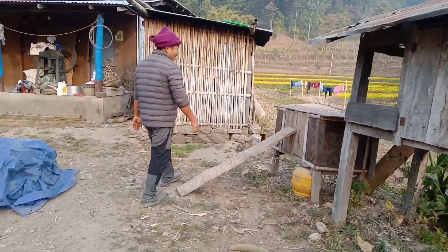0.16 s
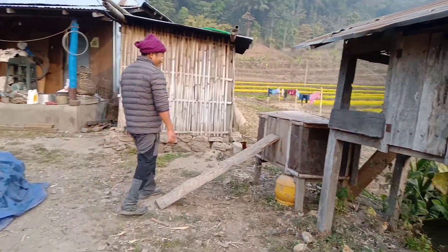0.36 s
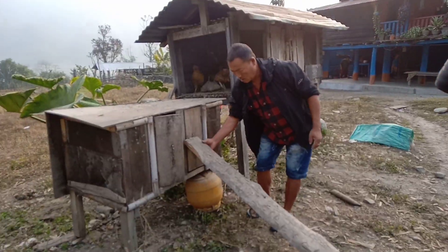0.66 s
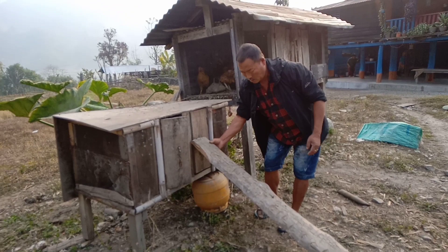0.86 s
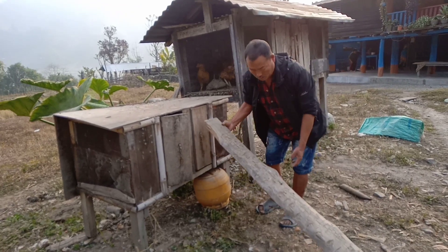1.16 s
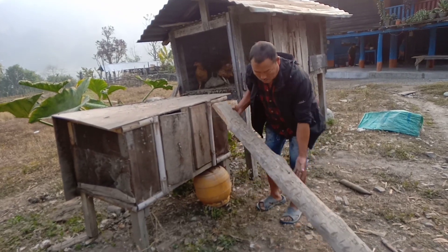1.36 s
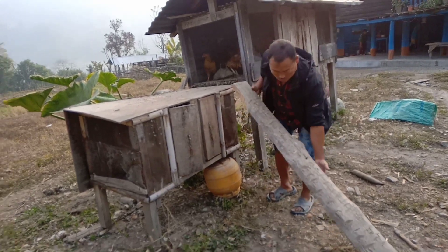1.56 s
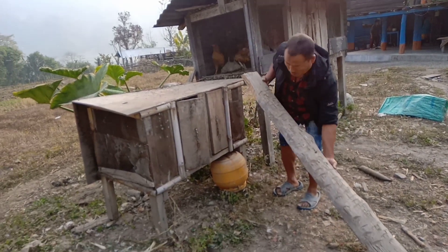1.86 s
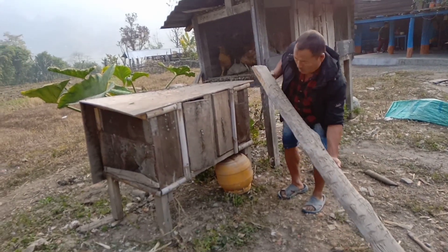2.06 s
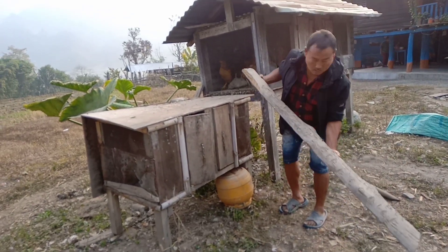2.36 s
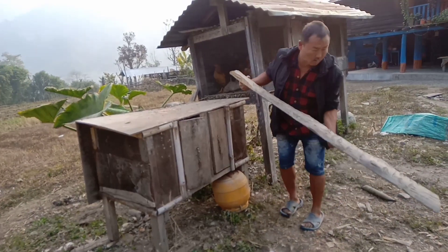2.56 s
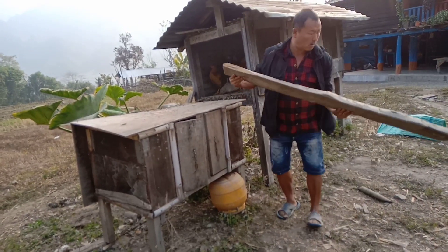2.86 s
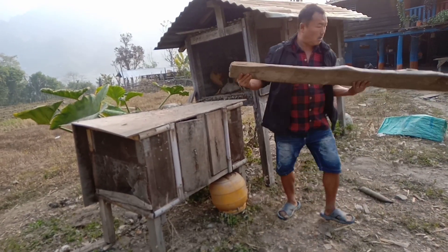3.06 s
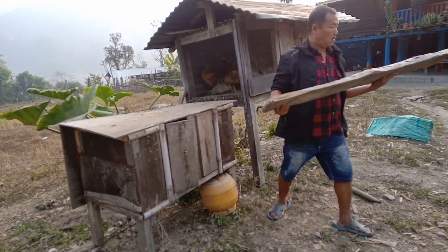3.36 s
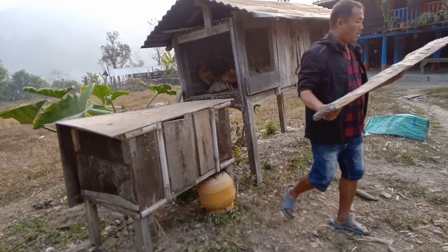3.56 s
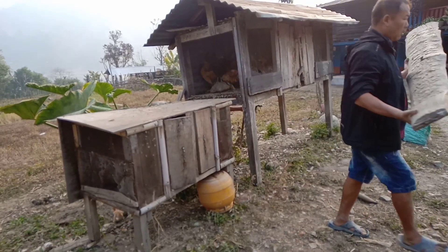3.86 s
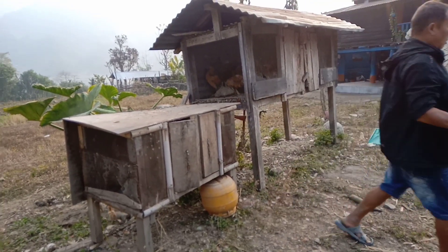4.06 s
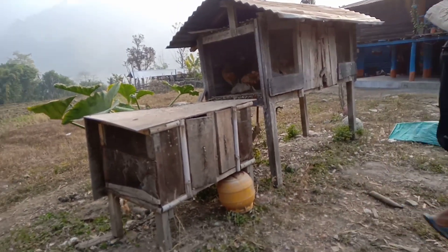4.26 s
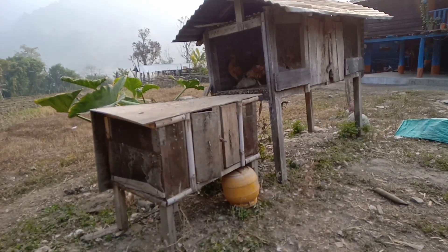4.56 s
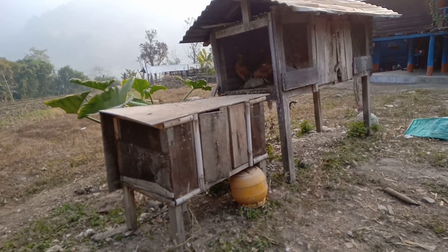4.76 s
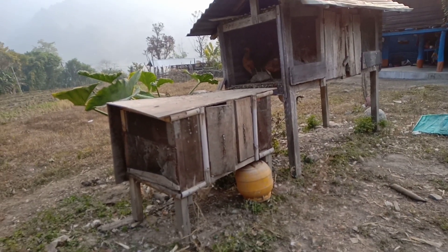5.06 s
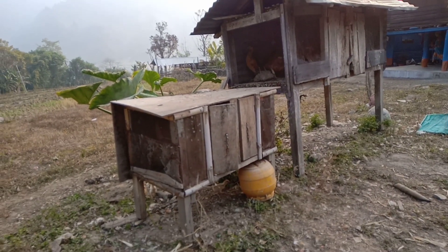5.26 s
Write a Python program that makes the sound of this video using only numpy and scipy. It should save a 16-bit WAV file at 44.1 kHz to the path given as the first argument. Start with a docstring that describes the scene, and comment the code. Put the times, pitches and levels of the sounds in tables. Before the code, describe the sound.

An outdoor village yard with soft air, slight hiss and a bright, diffuse echo from houses and wooden coops. The scene opens on the end of a goose honk, with a brief low hen croon, then a stick snaps sharply with a small thump at 0.19 s. The sound almost vanishes around 0.4 s. A hoarse honk swells from about 0.45 s and breaks into a rough growl until 0.93 s. Loud reedy honks follow at 1.65-2.07, 2.88-3.28 and 4.09-4.55 s, each scooping up, brightening into a high whistle, cracking upward and falling in a rasp. Chicks peep thinly throughout, clearer after 1 s, sliding downward, with fainter ones behind. The hen croons waveringly at 1.7-2.7 s and briefly at 3.3 and 3.6-4.1 s. Dull plank knocks and scuffs come near 0.2, 1.37, 1.55, 2.56, 4.7 and 5.34 s. Phone-like microphone, thin bass, goose a few metres away.

```python
"""Goose honking in a village yard

A domestic goose honks four times, a few metres from the microphone, among small wooden coops.
Its two syrinx membranes give a low reedy voice and a high whistle, multiplied for their sum tones;
in the last three honks the voice cracks upward, then falls in a rasp. The end of a honk opens the scene.
Chicks peep as sliding near-sines, a hen croons low, a stick snaps and a plank is handled as noise
bursts and thumps; noise echoes return the bright tail of the houses over soft open air."""
import sys
import numpy as np
from scipy import signal
from scipy.fft import rfft, irfft
from scipy.io import wavfile
from scipy.ndimage import uniform_filter1d, minimum_filter1d

SR = 44100
rng = np.random.default_rng(int(sys.argv[2]) if len(sys.argv) > 2 else 0)


def bounce(signal):
    """Save signal as a 16-bit WAV file at the path given by the first command-line argument."""
    frames = np.transpose(np.atleast_2d(signal))
    limited = np.clip(frames, -1, 1)
    pcm = np.round(limited * 32767).astype(np.int16)
    wavfile.write(sys.argv[1], SR, pcm)


N = 239330
TIME = np.arange(N) / SR
TOP_HZ = 15750  # top of the microphone's band
ATTACK_S = 0.0091  # onset of an opening, and of the rasp in a crack or fall

# stretches where the low voice repeats only every few cycles: [from t/s, to t/s, cycles, depth]
VOICE_SPLITS = [(.73, .93, 3, .27), (2.915, 2.975, 3, .22), (4.135, 4.2, 2, .06)]
# the throat's colour above the third harmonic: [f/Hz, level/dB]
THROAT_COLOUR = [(1700, 29.5), (2400, 6.5), (3050, 5), (3700, 5), (4300, -0.5), (5300, 3), (6300, -5),
                 (7300, -6), (8600, -21.5), (11000, -30.5), (15000, -36.5)]


def undb(db):
    """Decibels to gain."""
    return 10 ** (np.asarray(db) / 20)


def unit(x):
    """Scale to rms 1."""
    return x / np.sqrt(np.mean(x ** 2) + 1e-20)


def gain_at(points, hz):
    """Gain of a (Hz, dB) spectrum on a log axis."""
    f, db = np.transpose(points)
    return undb(np.interp(np.log(np.maximum(hz, 1)), np.log(f), db))


def colour(x, points):
    """Filter x by a (Hz, dB) spectrum that closes below its first point."""
    hz = np.fft.rfftfreq(len(x), 1 / SR)
    bass_cut = np.minimum(hz / points[0][0], 1) ** 2
    return irfft(rfft(x) * gain_at(points, hz) * bass_cut, len(x))


def noise(points):
    """Coloured noise of rms 1."""
    return unit(colour(rng.standard_normal(N), points))


def wander(rate, size=N):
    """Smooth random motion of rms 1, about rate turns a second."""
    k = max(int(SR / rate), 2)
    steps = np.repeat(rng.standard_normal(size // k + 2), k)
    return unit(uniform_filter1d(steps, k)[:size])


def gate(start, end, edge):
    """1 between two times, with soft edges."""
    return np.clip(np.minimum(TIME - start, end - TIME) / edge + .5, 0, 1)


def held(start, end, attack, release):
    """Attack, hold and release between two times."""
    return np.clip(np.minimum((TIME - start) / attack, (end - TIME) / release), 0, 1)


def strike(s, rise, t60):
    """Envelope of a blow at time s: a linear rise and an exponential decay."""
    age = np.maximum(TIME - s, 0)
    decay = np.exp(-np.log(1000) * np.minimum(age / t60, 10))
    return np.minimum(age / rise, 1) * decay


def curves(table, edge):
    """A table's gate, followed by its columns sample by sample."""
    s, *columns = np.transpose(table)
    return [gate(s[0], s[-1], edge)] + [np.interp(TIME, s, c) for c in columns]


def cycle(hz, jitter, rate):
    """Phase of an oscillator whose period is unsteady."""
    return 2 * np.pi * np.cumsum(hz * (1 + jitter * wander(rate, size=len(hz)))) / SR


def background():
    """Soft outdoor air and hiss, noise whose lows and highs swell apart, and faint low bands and hums."""
    # spectrum of the open air and the microphone's hiss: [f/Hz, level/dB per Hz]
    air_colour = [(60, -7), (130, -4.5), (400, -5.5), (800, -14.5), (1250, 0), (2000, -10), (3400, -3.5),
                  (5000, -12), (7000, -12), (8800, -26.5), (13800, -38), (15000, -23)]
    # loudness of the air and hiss: [t/s, level/dB]
    air_level = [(0, -51.5), (.38, -60), (.45, -38.5), (1.5, -51.5), (2.8, -53.5), (4, -56), (5.43, -60.5)]
    # faint low bands under the goose's growl and the hen's croon, and other hums:
    # [from t/s, to t/s, f/Hz, width/Hz, level/dB]
    hums = [(.7, 1.07, 210, 120, -45), (.72, .95, 390, 130, -42), (.92, 1.3, 560, 160, -52),
            (.95, 1.58, 131, 12, -58), (1.79, 1.95, 217, 10, -52), (2.1, 2.62, 730, 130, -48),
            (4.7, 5.2, 260, 50, -63), (4.74, 5.18, 870, 320, -58)]
    air = noise(air_colour)
    highs = colour(air, [(900, -30), (2200, 0), (16000, 0)])
    lows = air - highs
    air = lows * undb(1.2 * wander(6)) + highs * undb(2.2 * wander(11))
    out = air * undb(np.interp(TIME, *np.transpose(air_level)))
    for start, end, hz, width, db in hums:
        turn = 2 * np.pi * hz * TIME
        hum = wander(width) * np.sin(turn) + wander(width) * np.cos(turn)
        out = out + undb(db) * gate(start, end, 0.056) * hum
    return out


def chatter(db, spread_db, count):
    """Fainter chicks further off: short downward-curving sines at random moments."""
    out = np.zeros(N)
    for when, pitch, length, size in rng.random((count, 4)):
        t = np.linspace(0, 1, int(SR * (0.026 + 0.02 * length)))
        start = int((1 + when * 4.3) * SR)
        hz = (3500 + 1100 * pitch) * (1 - 0.44 * t ** 2)
        peep = np.sin(np.pi * t) * np.sin(cycle(hz, 0.02, 300))
        out[start:start + len(t)] += (undb(db + spread_db * size) * peep)[:N - start]
    return out


def chicks(jitter, flutter_db, overtone_db):
    """Each peep is a near sine that moves gently to a knee in its pitch, then slides down."""
    # peeps: [knee t/s, lead/s, fall/s, start f/Hz, knee f/Hz, level/dB before the 10 dB lift below]
    peeps = [(.304, 0.031, 0.056, 4300, 4410, -57), (1.058, 0.056, 0.039, 4280, 3750, -46.5),
             (1.25, 0.071, 0.069, 4020, 3550, -43.5), (1.314, 0.04, 0.046, 4750, 3454, -43.5),
             (2.199, 0.04, 0.059, 4580, 3890, -48), (2.239, 0.026, 0.028, 3610, 3197, -36),
             (2.45, .019, 0.027, 4400, 3890, -44.5), (2.476, 0.059, 0.029, 3730, 3040, -42.5),
             (2.631, 0.13, 0.073, 4110, 3876, -48.5), (2.845, .069, 0.063, 4120, 3990, -48),
             (3.416, 0.046, 0.04, 3110, 3080, -43), (3.53, .15, 0.052, 4050, 3804, -44.5),
             (3.735, 0.062, .08, 4170, 3996, -42.5), (3.83, .025, 0.033, 3410, 3380, -44),
             (4.061, 0.016, 0.049, 4200, 4170, -52.5), (4.651, .084, .036, 3540, 3593, -39.5),
             (4.795, 0.022, 0.015, 3765, 3300, -44.5), (4.942, 0.021, 0.015, 4670, 3440, -42),
             (4.99, .021, 0.078, 4080, 4140, -49.5), (5.09, 0.057, 0.064, 4020, 3700, -48.5),
             (5.26, 0.022, 0.028, 4520, 3750, -43), (5.41, 0.031, .03, 4140, 3630, -42)]
    end_share = .79  # the slide ends at this share of the knee's pitch
    out = np.zeros(N)
    for s, lead, fall, start_hz, knee_hz, db in peeps:
        live = (TIME > s - lead) & (TIME < s + fall)
        t, knots = TIME[live], [s - lead, s, s + fall]
        hz = np.interp(t, knots, [start_hz, knee_hz, knee_hz * end_share])
        phase = cycle(hz, jitter, 300)
        flutter = undb(db + 10.0 + flutter_db * wander(131.3, size=len(t)))
        swell = np.interp(t, knots, [0, 1, 0]) ** 0.57 * flutter
        out[live] += swell * (np.sin(phase) + undb(overtone_db) * np.sin(2 * phase))
    return out


def hen(jitter, shimmer):
    """A low, wavering croon: an unsteady sine with weak overtones."""
    # one curve per croon: [t/s, pitch f/Hz, level/dB, overtones' level/dB]
    croons = [
        [(0.085, 386, -48, -4), (0.16, 489, -49, -10)],
        [(1.72, 404.4, -45.5, -1), (1.97, 463, -38, -7), (2.52, 483.5, -39.5, -8), (2.62, 519, -35, -8.5),
         (2.74, 409.5, -40.5, -23)],
        [(3.27, 382.5, -47, -15), (3.332, 367, -45.5, 4), (3.38, 346, -60.5, -27)],
        [(3.62, 417, -48, 7.5), (3.926, 445, -38, -24), (4.12, 389, -53, 2)],
    ]
    out = 0
    for table in croons:
        on, hz, db, top_db = curves(table, .03)
        phase = cycle(hz, jitter, 160)
        overtones = 0.27 * np.sin(2 * phase) + .35 * np.sin(3 * phase) + 0.21 * np.sin(4 * phase)
        overtones = overtones + 0.28 * wander(150) * np.sin(3 * phase / 2)
        out = out + on * undb(db) * (np.sin(phase) + undb(top_db) * overtones)
    return np.sqrt(2) * out * (1 + shimmer * wander(70))


def snap(thump_hz, thump_t60, ring_hz, ring_db):
    """A stick snaps: two clicks with brief noise, the second with a far stronger thump and ring."""
    # cracks: [t/s, crack level/dB before filtering, thump level/dB]
    cracking = [(0.1854, -6.5, -63), (0.1913, -8, -27.5)]
    # the cracks' spectrum: [f/Hz, level/dB]
    crack_colour = [(100, -13), (600, -0.5), (1300, -0.5), (3000, -3), (6500, -7.5), (9000, -24),
                    (15000, -11.5)]
    cracks, body = np.zeros(N), 0
    for s, crack_db, thump_db in cracking:
        cracks[int(s * SR)] -= 3.0 * undb(crack_db)
        cracks = cracks + 1.9 * undb(crack_db) * strike(s, .0001, 0.0015) * rng.standard_normal(N)
        turn = 2 * np.pi * (TIME - s)
        tones = np.sin(thump_hz * turn) + undb(ring_db) * np.sin(ring_hz * turn)
        body = body + undb(thump_db) * strike(s, 0.0007, thump_t60) * tones
    return colour(cracks, crack_colour) + body


def knocks():
    """Plank and feet: decaying bursts of dull wood noise, with some grit in each."""
    # knocks and scuffs: [t/s, level/dB, rise/s, t60/s, grit level/dB relative to the wood]
    blows = [(0.201, -36.5, 0.0057, 0.1, -21), (1.371, -45, 0.0011, 0.051, 7),
             (1.549, -40.5, 0.0054, 0.1, -31), (2.561, -38.5, 0.0046, 0.41, -6.5),
             (4.697, -34.5, 0.0015, 0.11, -21), (5.342, -46, 0.0087, 0.16, -1)]
    # spectrum of the wood: [f/Hz, level/dB]
    wood_colour = [(80, -9.5), (200, -13.5), (450, -14.5), (750, -13), (1000, -13), (1300, -8),
                   (2100, -11.5), (3000, -9.5), (6000, -68), (10000, -44)]
    # spectrum of the grit: [f/Hz, level/dB]
    grit_colour = [(1000, -22.5), (3000, 4), (5500, 8.5), (8000, -4), (11000, -14.5), (15000, -34)]
    wood, grit = noise(wood_colour), noise(grit_colour)
    out = 0
    for s, db, rise, t60, grit_db in blows:
        out = out + undb(db) * strike(s, rise, t60) * (wood + undb(grit_db) * grit)
    return out


def reed(on, hz, base_db, third_db, top_db, beak_hz, jitter=0.0078, shimmer=0.14, waver_db=2.47,
         patchy_db=3.5):
    """Low membrane: three strong harmonics and overtones shaped by the throat; (sound, bare vibration)."""
    # resonances of the windpipe, with a notch near 1195 Hz from the ground's reflection,
    # applied to the first three harmonics: [f/Hz, level/dB]
    windpipe_and_ground = [(430, -0.5), (550, -7), (800, -11.5), (950, -13.5), (1110, -2), (1195, -7.5),
                           (1250, 5.5), (1400, -8.5), (1640, -2), (1800, -8.5), (2500, -15.5)]
    live = on > 0
    hz, base_db, top_db = (np.broadcast_to(c, N)[live] for c in (hz, base_db, top_db))
    size = len(hz)
    phase = cycle(hz, jitter, 450)

    low = 0
    for k, db in enumerate((base_db, 0, third_db), 1):
        level = gain_at(windpipe_and_ground, k * hz) * undb(db + waver_db * wander(37.5, size=size))
        low = low + level * np.sin(k * phase)

    orders = np.arange(4, 25)[:, None]
    beak = 1 + undb(11.5) / (1 + ((orders * hz - beak_hz) / 230) ** 2)
    patches = undb([patchy_db * wander(28.8, size=size) for _ in orders])
    weights = gain_at(THROAT_COLOUR, orders * hz) * beak * (orders * hz < TOP_HZ) * patches
    overtones = (weights * np.sin(orders * phase + orders ** 2 / 2)).sum(0)
    top = undb(top_db) * overtones / np.sqrt((weights ** 2).sum(0))

    swing = 1 + shimmer * wander(260, size=size)
    for start, end, cycles, depth in VOICE_SPLITS:
        slow = np.cos(phase / cycles) + .5 * np.cos(2 * phase / cycles)
        swing = swing + depth * gate(start, end, 0.029)[live] * slow

    sound, motion = np.zeros(N), np.zeros(N)
    sound[live] = np.sqrt(2) * (low + top) * swing * on[live]
    vibration = np.cos(phase) + 0.15 * np.cos(2 * phase) + 0.034 * np.cos(3 * phase)
    motion[live] = np.sqrt(on[live] * undb(base_db - 11)) * vibration
    return sound, motion


def whistle(table, shrill, jitter, edge, top_db, waver_db):
    """Second membrane: a clear tone growing shriller, upper harmonics tied to the fourth; (sound, level)."""
    on, hz, db = curves(table, edge)
    phase = cycle(hz, jitter, 300)
    overtones = 0
    for k, rel_db in enumerate(shrill, 2):
        overtones = overtones + undb(rel_db + waver_db * wander(35)) * np.sin(k * phase)
    for k in range(5, 10):
        level = undb(shrill[-1] + top_db) * gain_at(THROAT_COLOUR, k * hz.mean())
        overtones = overtones + level * np.sin(k * phase)
    # the overtones grow by 117 dB a second, up to the whistle's end
    growth = undb(117 * np.minimum(TIME - table[-1][0], 0))
    strength = undb(db) * on
    return np.sqrt(2) * strength * (np.sin(phase) + growth * overtones), strength


def rasp(motion, level, depth, flutter_db, mids_db, split_db):
    """Chaotic flapping: noise between the harmonics, pulsing each cycle, fuller where the voice splits."""
    # the rasp's body: [f/Hz, level/dB]
    mids_colour = [(150, -58), (350, -11), (650, -1), (900, -31), (1300, 13.5), (1700, -13.5), (2100, -8.5),
                   (3000, -52.5)]
    # the rasp's edge: [f/Hz, level/dB]
    top_colour = [(1200, -45.5), (2000, 3.5), (2800, 7), (3700, 7.5), (4600, -1.5), (6300, 1.5),
                  (7500, -15), (9000, -21.5), (12000, -59.5), (15500, -33.5)]
    mids, top = noise(mids_colour), noise(top_colour)
    beat = motion / np.sqrt(uniform_filter1d(motion ** 2, size=400).clip(0) + 1e-4)
    split = sum(share * gate(start, end, 0.0067) for start, end, _, share in VOICE_SPLITS)
    flapping = top + mids * undb(mids_db + split_db * split)
    return level * flapping * (1 + depth * beat) * undb(flutter_db * wander(280))


def hoarse_honk(db, rasp_db, growl_db, growl_rasp_db):
    """The first whole honk swells slowly and breaks into a growl: two (sound, vibration, rasp level)."""
    # pitch of the hoarse part: [t/s, f/Hz]
    hoarse_pitch = [(0.49, 657.5), (0.558, 597.6), (0.636, 618.8), (0.68, 604.7), (0.692, 586),
                    (0.73, 508.7)]
    # pitch of the growl: [t/s, f/Hz]
    growl_pitch = [(0.75, 541.5), (0.81, 583.6), (0.858, 593), (0.92, 553.3)]
    swell = held(start=.44, end=0.786, attack=0.14, release=0.11)
    growl = held(start=.71, end=0.93, attack=0.015, release=0.024)
    hz, growl_hz = (np.interp(TIME, *np.transpose(c)) for c in (hoarse_pitch, growl_pitch))
    hoarse_voice = reed(undb(db) * swell ** 2, hz, base_db=-1, third_db=-1.5, top_db=-6, beak_hz=3370)
    growl_voice = reed(undb(growl_db) * growl, growl_hz, base_db=-11, third_db=-21.5, top_db=-21,
                       beak_hz=2870)
    return [(*hoarse_voice, undb(rasp_db) * swell ** 0.51),
            (*growl_voice, undb(growl_rasp_db) * growl)]


def openings(whistle_amp, steal, dull_db):
    """A honk scoops up, holds and brightens until the whistle takes its air: (sound, vibration, rasp level)."""
    # [start t/s, end t/s, release/s, pitch f/Hz, second harmonic's level/dB before accent and windpipe,
    #  then relative to it: fundamental/dB, third harmonic/dB, overtones/dB, rasp/dB; beak f/Hz]
    honks = [(-.06, 0.059, 0.1, 554.4, -22.5, -26, -30, -11.5, -11.5, 2780),
             (1.653, 1.861, 0.14, 606.7, -20.5, 2, 4.5, 6.5, -13, 3650),
             (2.882, 3.066, 0.15, 582.4, -18.5, 0, -3, 1, -7, 2990),
             (4.092, 4.371, 0.015, 600.6, -18, 2.5, -2, 1, -14, 3100)]
    scoop_share, scoop_s = .115, .04  # starts this share flat and takes this long to reach its pitch
    beak_shut_db, beak_opens_s = -13.5, 0.076  # the overtones swell as the beak opens
    air = 1 / (1 + steal * whistle_amp)
    for start, end, release, pitch, db, base_db, third_db, top_db, rasp_db, beak_hz in honks:
        on = undb(db) * held(start, end, ATTACK_S, release) * air
        scoop = np.interp(TIME, [start, start + scoop_s], [1, 0])
        # the windpipe rings hardest during the scoop, in harmonics 2 and 3
        accent_db = 5 * np.sqrt(scoop)
        shut_db = np.interp(TIME, [start, start + beak_opens_s], [beak_shut_db, 0])
        bright_db = top_db + shut_db + dull_db * (1 - air)
        hz = pitch * (1 - scoop_share * scoop)
        sound, motion = reed(on * undb(accent_db), hz, base_db - accent_db, third_db,
                             bright_db - accent_db, beak_hz)
        yield sound, motion, on * undb(rasp_db + 0.17 * shut_db)


def slides(table, sag, release, burst_db, settle_s):
    """The voice jumps register as its rasp level settles, then sags: (sound, vibration, rasp level)."""
    for start, end, attack, pitch, db, base_db, third_db, top_db, rasp_db, beak_hz in table:
        on = undb(db) * held(start, end, attack, release)
        age = np.clip(TIME - start, 0, end - start)
        rasp_level_db = db + rasp_db + burst_db * np.exp(-age / settle_s)
        chaos = held(start, end, ATTACK_S, release) * undb(rasp_level_db)
        yield *reed(on, pitch - sag * age, base_db, third_db, top_db, beak_hz), chaos


def goose():
    """Both membranes sound together; their product gives sum tones between the harmonics."""
    # the second membrane's whistle, one curve per honk: [t/s, pitch f/Hz, level/dB]
    whistles = [
        [(1.722, 1487, -22.5), (1.74, 1501, -18), (1.838, 1545, -13.5), (1.9, 1552, -17.5), (1.92, 1553, -33)],
        [(2.965, 1538, -22), (2.983, 1572, -18), (3.001, 1625, -18), (3.073, 1608, -16), (3.105, 1595, -26.5)],
        [(4.21, 1498, -24), (4.25, 1580, -13), (4.314, 1549, -13), (4.352, 1515, -23.5)],
    ]
    # how shrill each whistle ends: [harmonic 2/dB, harmonic 3/dB, harmonic 4/dB], relative to its tone
    shrillness = [(-3, -8, -6.5), (-2.5, -18.5, -6.5), (-10.5, -28, -23)]
    # cracks into the upper register: [start t/s, end t/s, attack/s, first pitch f/Hz,
    #  second harmonic's level/dB before the windpipe, then relative to it:
    #  fundamental/dB, third harmonic/dB, overtones/dB, rasp/dB; beak f/Hz]
    cracks = [(1.905, 1.965, 0.031, 890.5, -14, 3, 1, -12.5, -11, 2600),
              (3.106, 3.195, 0.0064, 829.3, -16.5, 7, 0, -8.5, -15, 2840),
              (4.361, 4.44, 0.0054, 841, -13, -6, 1, -9.5, -29, 3420)]
    # closing falls: [same columns and units as the cracks]
    falls = [(1.952, 2.068, 0.014, 686, -18, 1, -9, -10, -24, 2780),
             (3.184, 3.275, 0.016, 592, -14.5, -0.5, -22.5, -19, -30, 2795),
             (4.425, 4.545, 0.053, 635.5, -16.5, -4, -7.5, -15, -14, 3060)]
    tone, strength = np.sum([whistle(t, shrill, jitter=0.0029, edge=0.01, top_db=-2, waver_db=5.5)
                             for t, shrill in zip(whistles, shrillness)], axis=0)
    # sag in Hz per second, release in seconds
    voice, motion, chaos = np.sum([
        *hoarse_honk(db=-19.5, rasp_db=-32.5, growl_db=-25.5, growl_rasp_db=-34),
        *openings(strength, steal=9.3, dull_db=-20),
        *slides(cracks, sag=1000, release=0.013, burst_db=0.5, settle_s=0.013),
        *slides(falls, sag=1620, release=0.046, burst_db=-5, settle_s=0.026)], axis=0)
    sum_tones = colour(tone * motion, [(500, -24.0), (1000, -15), (1600, -12.0), (2150, 5),
                                       (3600, -12.5), (6000, -9.5), (9000, -10)])
    flapping = rasp(motion, chaos + undb(-26.5) * strength, depth=0.14, flutter_db=3.0,
                    mids_db=-7.5, split_db=37.5)
    # a small throat radiates no bass
    bass_cut = signal.butter(3, 130, "high", fs=SR, output="sos")
    return signal.sosfilt(bass_cut, voice + tone + sum_tones + flapping)


def yard(x, t60, tail_db, early_t60, early_db, send=1):
    """Quick scatter from the coops and a later tail from the houses, as decaying noise echoes."""
    # colour of the yard's echo: [f/Hz, level/dB]
    echo_colour = [(150, -19.5), (500, -13), (1300, -2.5), (3200, 5.5), (6500, 2.5), (10000, -1),
                   (15000, -1)]
    near = noise(echo_colour) * strike(0.0028, 0.00073, early_t60)
    far = noise(echo_colour) * strike(0.0067, 0.008, t60)
    response = (undb(early_db) * unit(near) + undb(tail_db) * unit(far)) / np.sqrt(N)
    return x + signal.fftconvolve(x * send, response)[:N]


def scene():
    """Birds and wood in the yard, over the open air."""
    # calls that echo more: [from t/s, to t/s, level/dB of the echo added to the usual send of 1]
    echoing = [(.72, 1, 10.5), (3.111, 3.28, -3.5)]
    peeps = chicks(jitter=0.015, flutter_db=4.5, overtone_db=-27)
    peeps = peeps + chatter(db=-57.5, spread_db=0.5, count=44)
    near = goose() + hen(jitter=0.039, shimmer=0.5) + knocks()
    near = near + snap(thump_hz=132, thump_t60=0.035, ring_hz=1220, ring_db=-0.5)
    # the chicks sit inside a coop, so more of their sound is scattered
    cooped = yard(peeps, t60=0.53, tail_db=-21, early_t60=0.43, early_db=-11)
    send = 1 + sum(undb(db) * gate(start, end, 0.031) for start, end, db in echoing)
    around = yard(near, t60=0.69, tail_db=-17.5, early_t60=0.27, early_db=-13, send=send)
    return (around + 0.74 * cooped + background())[None]


def limit(x, ceiling, size):
    """A quick limiter holds the loudest peaks under a ceiling."""
    allowed = ceiling / np.maximum(np.abs(x), ceiling)
    return x * uniform_filter1d(minimum_filter1d(allowed, size), size)


def record(dry):
    """The phone loses the deep bass and limits the peaks; the sound drops out briefly; the top is cut."""
    # the moment when the sound nearly vanishes: [from t/s, to t/s]
    dropout = (.39, .425)
    bass_cut = signal.butter(2, 60, "high", fs=SR, output="sos")
    thin = signal.sosfilt(bass_cut, dry)
    kept = limit(thin, ceiling=.56, size=300) * (1 - .97 * gate(*dropout, .002))
    top_cut = signal.ellip(10, .2, 80, TOP_HZ, fs=SR, output="sos")
    return signal.sosfilt(top_cut, kept)


dry = scene()
out = record(dry)
bounce(out)
```